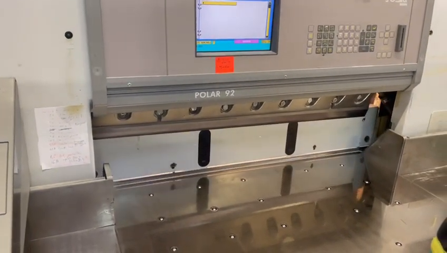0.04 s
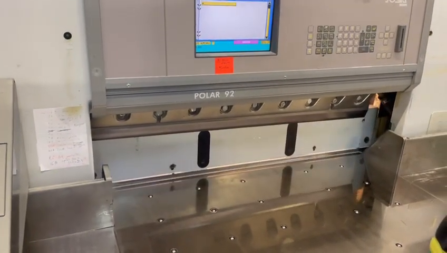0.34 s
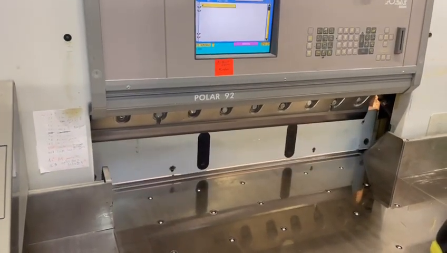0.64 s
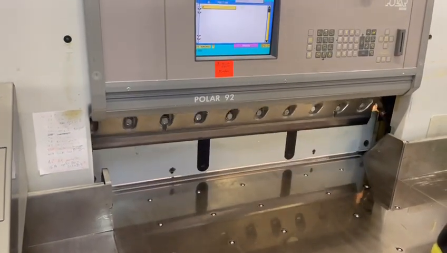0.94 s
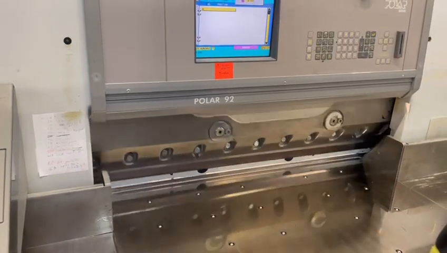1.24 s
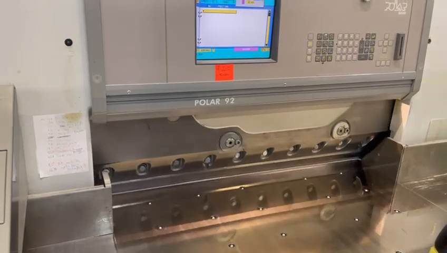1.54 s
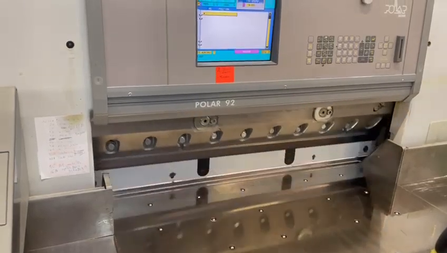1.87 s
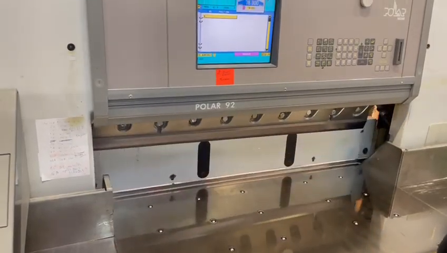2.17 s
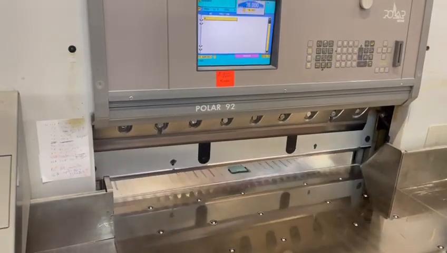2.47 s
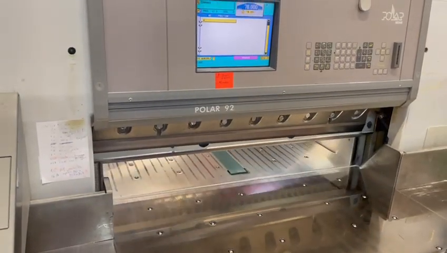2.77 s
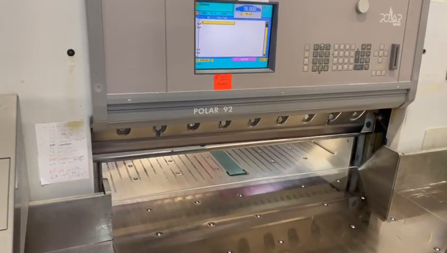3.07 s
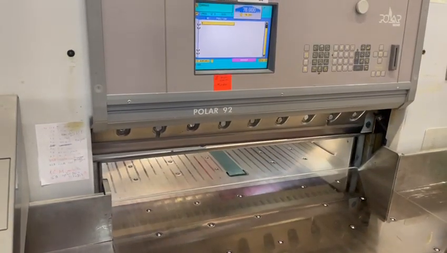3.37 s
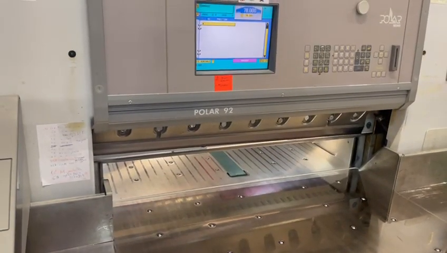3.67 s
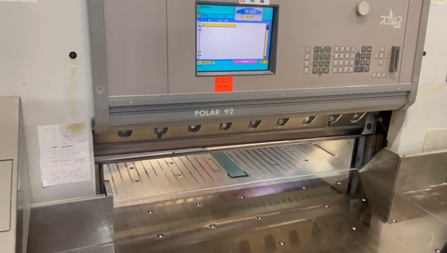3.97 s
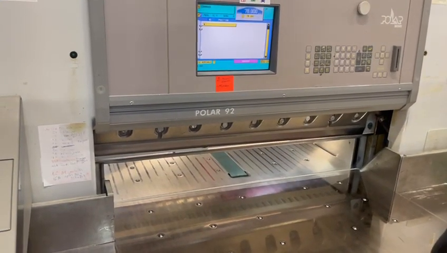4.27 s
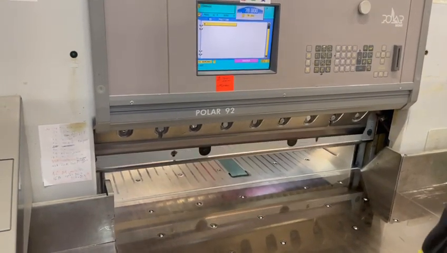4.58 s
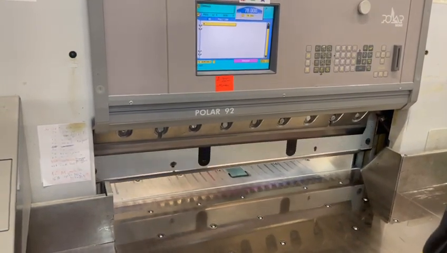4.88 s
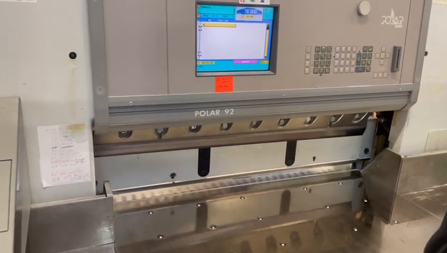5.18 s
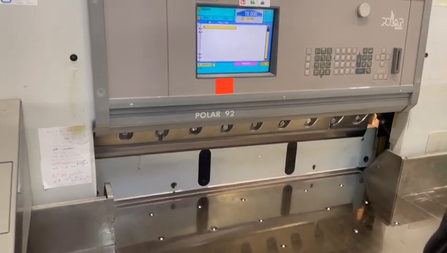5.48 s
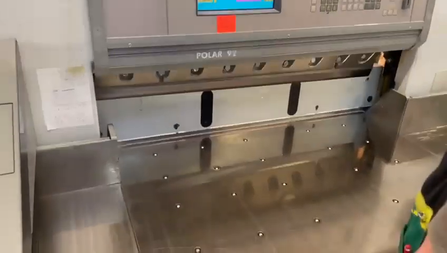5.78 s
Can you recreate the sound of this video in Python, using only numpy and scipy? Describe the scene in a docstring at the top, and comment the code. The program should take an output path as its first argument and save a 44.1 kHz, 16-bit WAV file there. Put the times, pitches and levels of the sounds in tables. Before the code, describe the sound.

Heard from just in front, an industrial paper cutter runs with a steady motor drone and rush of air. It opens with a heavy metal clunk, followed by clamp knocks, short scrapes and a groaning whine as the blade moves without paper. A sharp clack and a few rattling snaps follow. After a stretch of plain humming, the hydraulic pump grows louder and another heavy clunk rings briefly in the workshop.

```python
"""A workshop: a hydraulic paper guillotine runs through one empty cut.
Fan and oil flow rush, cooling air hisses, and a thin hiss returns with every turn of the belt.
Motor and pump hum throughout; pump and gears sag in pitch as the whining knife drive loads the flywheel.
A heavy clunk opens and closes the cycle. Between them clamp, clutch and knife linkage rub, snap and
knock on the steel frame. A gain control ducks the loudest blows."""
import sys
import numpy as np
from scipy import signal
from scipy.io import wavfile
from scipy.ndimage import uniform_filter1d

SR = 44100
rng = np.random.default_rng(int(sys.argv[2]) if len(sys.argv) > 2 else 0)


def transcribe(signal):
    """Save signal, clipped to [-1, 1], as a 16-bit WAV file at the path in sys.argv[1]."""
    frames = np.atleast_2d(signal).T
    limited = np.clip(frames, -1, 1)
    pcm = np.round(limited * 32767).astype(np.int16)
    wavfile.write(sys.argv[1], SR, pcm)


N = 265482
TIME_S = np.arange(N) / SR
EDGES_HZ = 22 * 2 ** np.arange(0, 9.4, 1 / 3)   # third-octave bands
CENTRES_HZ = np.sqrt(EDGES_HZ[1:] * EDGES_HZ[:-1])
CLUTCH_IN_S, CLUTCH_OUT_S = .76, 2.15
KNIFE_START_S, KNIFE_BOTTOM_S, KNIFE_REST_S = .76, 1.65, 2.42
VANE_HZ, MESH_HZ = 322.5, 297   # pump vanes and gear mesh at full speed

# Stereo balance. Each row: frequency in Hz, left minus right in dB.
BALANCE = [(60, -1), (130, -3), (250, -2), (600, 1), (2000, -0.3), (5000, 0.7), (11000, -10)]
# Width of running noise and blows. Each row: frequency in Hz, left-right correlation before clipping.
RUNNING_CORRELATION = [(60, 0.86), (110, 0.92), (200, 0.83), (350, 0.21), (640, 0.05), (1160, -0.19),
                       (2100, 0.42), (3600, 0.058), (5000, 1), (6300, -2.9), (11000, -0.71)]
BLOW_CORRELATION = [(100, 1), (350, 0.91), (640, 0.27), (1160, 0.15), (2100, 0.68), (3800, 0.11),
                    (5000, 0.57), (6500, -1.3), (8000, -0.95), (10000, 1)]
# Noise spectra. Each row: frequency in Hz, relative density in dB.
RUNNING_SPECTRUM = [(15, -68), (25, -54), (48, -10), (69, -8), (103, -7.5), (191, -6.5), (210, -9.5),
                    (319, -9.5), (349, -11), (375, -8), (568, -8.5), (990, -15), (1430, -17.5),
                    (2100, -24.5), (2650, -23), (3600, -27.5), (6300, -35.5), (8190, -127), (13900, -120)]
SLIDING_SPECTRUM = [(80, -22), (150, 12.5), (450, -24), (800, 0), (1300, -19), (3000, -13.5), (6000, -20.5)]
ARMATURE_SPECTRUM = [(300, 1), (800, 0), (1100, 2.5), (1500, -2), (3100, -1.5), (3900, -20), (5500, -4),
                     (7000, -19), (11000, -25)]
SNAP_SPECTRUM = [(150, -1), (260, 0), (400, 5), (800, -18), (2100, -5), (5000, -0.5), (7000, 4), (9500, -9),
                 (12500, -28)]
CLUNK_SPECTRUM = [(60, -21), (100, -10.5), (140, 1.5), (240, 1.5), (380, -5.5), (520, -4.5), (690, -1.5),
                  (1000, -8.5), (1400, -5), (1750, -17), (2800, -15), (3700, -33.5), (5500, -26),
                  (12500, -54)]
ECHO_SPECTRUM = [(300, -15), (900, -11), (1500, 6.5), (2300, -3), (2700, -10), (3400, -2), (4200, -25),
                 (7000, -29)]
CRACK_SPECTRUM = [(1500, -8), (4200, 3), (6000, 3), (7500, 3), (8500, 1), (10000, -3), (12500, -28)]
# Panel colours. Each row: frequency in Hz, relative band level in dB.
SCRAPE_COLOUR = [(250, -6), (700, -1.5), (1200, -9), (1700, -7), (2700, -7), (3800, -19), (6500, -23)]
KNOCK_COLOUR = [(130, -2.5), (230, 2), (420, -2), (900, 0.5), (2100, -13), (6500, -30)]
# Hiss resonances. Each row: centre in Hz, width in Hz, relative level in dB, left-right correlation.
AIR_PEAKS = [(5000, 1300, -52.5, .9), (6100, 800, -57, .9), (7300, 2400, -50.5, -.9),
             (10000, 2200, -56, .95)]
BELT_PEAKS = [(4930, 280, 1, .9), (5100, 1800, -3, .3), (8300, 1700, -4, -.95), (9650, 1300, -1.5, .95)]
# Belt brushes. Each row: time into the turn in seconds, half length in seconds, relative level in dB.
BELT_BRUSHES = [(0.047, 0.095, -51.5), (0.973, 0.17, -50)]
# Motor and fan tones. Each row: frequency in Hz, level in dB.
MOTOR_TONES = [(80.4, -36), (113.0, -44.5), (271, -41.5), (376.8, -42.5), (963.6, -42.5), (1195, -46),
               (2449, -54.5), (2568, -69)]
# Pump under pressure. Each row: start in seconds, end in seconds, level in dB.
PUMP_SPELLS = [(-.1, .08, -30), (0.185, 0.53, -27), (0.645, 0.98, -28.5), (0.98, 1.65, -32),
               (2.614, 3.5, -37), (4.515, 5.57, -29), (5.68, 6.2, -29.5)]
# Pressure peaks as the clamp bears down or meets its top stop.
# Each row: centre in seconds, half length in seconds, level in dB.
PUMP_SURGES = [(0.705, 0.03, -22.5), (2.746, .04, -41), (5.43, 0.097, -38)]
# Whine partials. Each row: multiple of the mesh or vane rate, relative level in dB.
MESH_ORDERS = [(1, -2.5), (2, -6.5)]
VANE_ORDERS = [(2, -1.5), (3, -9)]
# Drive groans. Each row: centre in seconds, full-speed pitch in Hz, half length in seconds, level in dB.
GROANS = [(0.903, 964, 0.049, -34), (0.966, 592, 0.048, -31.5), (1.092, 154, 0.06, -25),
          (1.465, 588, 0.05, -29), (1.49, 649, 0.054, -34.5), (1.507, 836, 0.32, -34.5),
          (1.544, 841, 0.021, -30), (2.047, 296.6, 0.11, -36), (2.122, 601, 0.08, -37)]
# Rubs. Each row: centre in seconds, half length in seconds, relative level in dB, tilt in dB per octave.
SCRAPES = [(0.552, 0.02, -34.5, 2), (0.707, 0.032, -40, 2), (0.923, 0.029, -36.5, 0.5),
           (1.634, 0.043, -38, -5.5)]
# Steel modes. Each row: frequency in Hz, relative level in dB, t60 in seconds before damping and cap.
ARMATURE_MODES = [(1063, 0, 0.057), (1121, 2, 0.059), (1490, -6, 0.045), (1890, -5, 0.066),
                  (2556, -2.5, 0.039), (3120, -12, 0.031), (5130, -14, .04)]
PAWL_MODES = [(387, -2.5, 0.076), (470, -13, .08), (758, 0, 0.062), (1340, -2, .035), (1460, -4, .035),
              (1555, 4, 0.027), (1800, 0, 0.017), (2166, -1.5, 0.053), (2264, 1.5, 0.046),
              (3160, -9, 0.069), (3300, -11, .04), (3740, -10.5, .03), (4740, -21, .11), (5270, -21, 0.12),
              (5680, -27, .15), (6200, -32, 0.22)]
CATCH_MODES = [(375, 5, .09), (725, 2.5, .07), (830, 3, .06), (1020, 0, 0.058), (1200, 4, 0.06),
               (3675, -8, 0.074), (4450, -8, 0.083), (5540, -6, 0.07), (8920, -3, .025), (9500, -5, .06)]
CLAMP_MODES = [(200, -8, 0.12), (389, 0, 0.1), (682, -1, 0.035), (870, -30, 0.047), (985, -9, 0.059),
               (1227, -9.5, 0.04)]
FRAME_MODES = [(125.2, -6, 0.57), (168, -11, 0.3), (203, -4, 0.3), (254, 2.5, 0.25), (306, -22, 0.1),
               (358.7, -3.5, 0.52), (379, 5, 0.11), (458, -0.5, 0.13), (650, 1, 0.099), (693, 3.5, 0.068),
               (853, 1, 0.07), (1100, -4, 0.091), (1322, -7, 0.028), (1435, -6, 0.091), (2013, -2, 0.1),
               (2205, -14, 0.13)]
# Strikes of small parts. Each row: start in seconds, ring level in dB, rattle level in dB.
ARMATURE_HITS = [(0.693, -24, -22.5), (0.7027, -33, -27), (0.721, -47, -36), (0.733, -37, -42),
                 (2.201, -28.5, -22), (2.209, -34, -26)]
PAWL_HITS = [(1.8182, -14.5, -35), (1.8225, -32, -41), (1.828, -37, -33)]
CATCH_HITS = [(2.305, -22, -27), (2.312, -23, -20), (2.325, -33, -26)]
# Strikes on the clamp beam. Each row: start in seconds, level in dB.
CLAMP_HITS = [(0.598, -13), (0.6193, -11), (0.889, -22.5), (0.912, -20), (0.93, -28)]
# Light blows. Each row: start in seconds, relative level in dB, tilt in dB per octave.
KNOCKS = [(.119, -29, -0.5), (0.595, -28, 1), (0.614, -25, 0), (.893, -34, -4.5), (1.541, -26, -0.5),
          (1.588, -31.5, 2), (1.603, -31, -2.5), (1.8191, -30, -5), (2.207, -38.5, -5), (2.237, -34, -1.5),
          (2.291, -29.5, -2)]
# Heavy blows. Each row: start in seconds, relative level in dB, crack offset in dB.
CLUNKS = [(.036, 3, 0.5), (5.496, 2.5, 2.5)]


def from_db(db):
    """Decibels to gain."""
    return 10 ** (np.asarray(db) / 20)


def unit_rms(x):
    """Scale to rms 1."""
    return x / np.sqrt(np.mean(x ** 2) + 1e-20)


def at_hz(table, hz):
    """Read a table on a log-frequency axis."""
    points_hz, values = np.array(table).T
    return np.interp(np.log(hz), np.log(points_hz), values)


def balance(hz):
    """Left and right gain at a pitch; bass leans right."""
    return from_db(at_hz(BALANCE, hz) * np.array([[.5], [-.5]]))


def drift(rate_hz):
    """Smooth random wander of rms 1."""
    pole = np.exp(-200 * np.pi * rate_hz / SR)
    white = rng.standard_normal(N // 100 + 1002)
    slow = signal.lfilter([1], [1, -2 * pole, pole * pole], white)[1000:]
    return np.interp(np.arange(N) / 100, np.arange(len(slow)), unit_rms(slow))


def smooth(x, tau_s):
    """First-order lag."""
    pole = np.exp(-1 / (tau_s * SR))
    return signal.lfilter([1 - pole], [1, -pole], x)


def swell(centre_s, half_s):
    """Gaussian bell of height 1."""
    return np.exp(-.5 * ((TIME_S - centre_s) / half_s) ** 2)


def gate(start_s, end_s, ramp_s):
    """1 from start to end, with a ramp centred on each."""
    return np.clip(np.minimum(TIME_S - start_s, end_s - TIME_S) / ramp_s + .5, 0, 1)


def stereo_band(white, edges_hz, correlation):
    """Band-pass two noises and mix them as mid and side; rms 1."""
    mid, side = signal.sosfilt(signal.butter(2, edges_hz, "band", fs=SR, output="sos"), white)
    return unit_rms(np.sqrt(1 + correlation) * mid + np.sqrt(1 - correlation) * side * [[1], [-1]])


def noise_bands(correlations):
    """Third-octave bands of stereo noise."""
    white = rng.standard_normal((2, 2, N))
    clipped = np.clip(at_hz(correlations, CENTRES_HZ), -.99, .99)
    return [balance(hz) * stereo_band(white[k % 2], EDGES_HZ[k:k + 2], clipped[k])
            for k, hz in enumerate(CENTRES_HZ)]


def peaked_noise(peaks):
    """Stereo noise in a few broad resonances."""
    out = np.zeros((2, N))
    for hz, width_hz, db, correlation in peaks:
        white = rng.standard_normal((2, N))
        out += from_db(db) * stereo_band(white, [hz - width_hz / 2, hz + width_hz / 2], correlation)
    return out


def band_gains(spectrum):
    """Band gains of total power 1; no bands above the last row."""
    gains = from_db(at_hz(spectrum, CENTRES_HZ)) * np.sqrt(CENTRES_HZ)
    gains *= EDGES_HZ[:-1] < spectrum[-1][0]
    return gains / np.linalg.norm(gains)


def panel_gains(colour, db_per_octave):
    """Band gains tilted by contact hardness; the panels are too small to radiate deep bass."""
    tilt_db = db_per_octave * np.log2(np.maximum(CENTRES_HZ, 250) / 800)
    rolloff = np.sqrt((1 + (150 / CENTRES_HZ) ** 6) * (1 + (CENTRES_HZ / 10500) ** 8))
    return from_db(at_hz(colour, CENTRES_HZ) + tilt_db) / rolloff


def tone(hz, waver_db, spread):
    """Stereo sine; reflections make its level waver, and its phase at each ear."""
    phase = 2 * np.pi * np.cumsum(hz + np.zeros(N)) / SR
    spread_rad = spread * min(np.mean(hz) / 600, 1)
    ears = np.array([np.sin(phase + spread_rad * drift(1)) for _ in range(2)])
    return np.sqrt(2) * balance(np.mean(hz)) * ears * from_db(waver_db * drift(2.6))


def ring(modes, hits, damping, max_t60_s):
    """Each hit sets the modes of a steel part ringing."""
    clicks, out = np.zeros(N) + 1e-18, np.zeros((2, N))
    for start_s, db, *_ in hits:
        clicks[int(start_s * SR)] += from_db(db)
    for k, (hz, db, t60_s) in enumerate(modes):
        pole = from_db(-60 / (min(t60_s / damping, max_t60_s) * SR))
        step_rad = 2 * np.pi * hz / SR
        mode = signal.lfilter([0, np.sin(step_rad)], [1, -2 * pole * np.cos(step_rad), pole ** 2], clicks)
        out += (-1) ** k * from_db(db) * balance(hz) * mode
    return out


def blow(bands, start_s, gains, rise_s, tail_db, t60_s, lag_s=.0002):
    """Dense panel modes: bending waves bring treble before bass, then the room rings. Times at 1 kHz."""
    start = int(start_s * SR)
    t = TIME_S[:min(N - start, int(.6 * SR))]
    span = slice(start, start + len(t))
    out = np.zeros((2, N))
    for band, hz, gain in zip(bands, CENTRES_HZ, gains):
        slowness = np.sqrt(1000 / max(hz, 250))
        age_s = np.maximum(t - lag_s * slowness, 0)
        onset = age_s / (rise_s * slowness ** .29)
        direct = onset * np.exp(1 - onset)
        tail = from_db(tail_db - 60 * age_s / (t60_s * slowness ** .44)) * (1 - np.exp(-onset))
        out[:, span] += gain * np.hypot(direct, tail) * band[:, span]
    return out


def rattle(bands, hits, spectrum, **envelope):
    """The housing scatters each strike of a small part into a noise burst."""
    gains = band_gains(spectrum)
    return sum(blow(bands, start_s, from_db(db) * gains, **envelope) for start_s, _, db in hits)


def flywheel_speed(sag=.0655):
    """1 when free; sags while the clutch is in, then recovers."""
    loaded = (TIME_S > CLUTCH_IN_S) & (TIME_S < CLUTCH_OUT_S)
    return 1 - sag * smooth(loaded, tau_s=.21)


def knife_effort(down_db=-37.5, upstroke_db=-3, strain_db=3.5):
    """Drive gain: steady going down, straining at the bottom, lighter going up."""
    db = down_db + upstroke_db * (TIME_S > KNIFE_BOTTOM_S) + strain_db * swell(KNIFE_BOTTOM_S, .066)
    return gate(KNIFE_START_S, KNIFE_REST_S, ramp_s=.19) * from_db(db)


def running_noise(rush_db=-25.67, sliding_db=3):
    """Fan and oil flow rush, lumpy in the bass; sliding steel adds noise while the knife moves."""
    sliding = knife_effort() * from_db(sliding_db)
    rush_gains = from_db(rush_db) * band_gains(RUNNING_SPECTRUM)
    lumps_db = 2 / np.sqrt(1 + CENTRES_HZ / 300)
    layers = zip(noise_bands(RUNNING_CORRELATION), rush_gains, band_gains(SLIDING_SPECTRUM), lumps_db)
    return sum(band * np.hypot(rush, slide * sliding) * from_db(lump_db * drift(14.7))
               for band, rush, slide, lump_db in layers)


def cooling_air(gain_db=-1.5):
    """Cooling air hisses steadily."""
    return from_db(gain_db) * peaked_noise(AIR_PEAKS)


def belt(gain_db=1.5, turn_s=1.598, flutter_db=2):
    """A slowly turning part, likely the belt, brushes twice a turn, gripping and slipping."""
    hiss = peaked_noise(BELT_PEAKS) * from_db(flutter_db * drift(25))
    return hiss * sum(from_db(db + gain_db) * swell(start_s + offset_s, half_s)
                      for offset_s, half_s, db in BELT_BRUSHES
                      for start_s in np.arange(0, TIME_S[-1], turn_s))


def motor():
    """Motor and fan hum; the high tones wander more in pitch."""
    out = np.zeros((2, N))
    for hz, db in MOTOR_TONES:
        jitter = .0005 if hz < 1100 else .003
        out += from_db(db) * tone(hz * (1 + jitter * drift(5)), waver_db=1, spread=.4)
    return out


def flywheel_gear(level_db=-39, throb_hz=4.3, depth=.64):
    """The idling gear hums at the mesh rate and throbs."""
    throb = 1 + depth * np.sin(2 * np.pi * throb_hz * TIME_S)
    return from_db(level_db) * throb * tone(MESH_HZ * flywheel_speed(), waver_db=2, spread=.5)


def pump(idle_db=-41.5, valve_s=.082):
    """The vane note swells with pressure and sags with the flywheel."""
    work = sum(from_db(db) * gate(start_s, end_s, valve_s) for start_s, end_s, db in PUMP_SPELLS)
    surge = sum(from_db(db) * swell(centre_s, half_s) for centre_s, half_s, db in PUMP_SURGES)
    pressure = np.hypot(from_db(idle_db), work + surge)
    return pressure * tone(VANE_HZ * flywheel_speed(), waver_db=.5, spread=.3)


def knife_drive(rough_db=2):
    """Loaded gear and pump tones whine and swell briefly into rough groans; all sag with the flywheel."""
    partials = [(k * MESH_HZ, db) for k, db in MESH_ORDERS] + [(k * VANE_HZ, db) for k, db in VANE_ORDERS]
    speed = flywheel_speed()
    whine = sum(from_db(db) * tone(hz * speed * (1 + .005 * drift(30)), waver_db=2.5, spread=.5)
                for hz, db in partials)
    out = knife_effort() * whine
    for centre_s, hz, half_s, db in GROANS:
        envelope = from_db(db + rough_db * drift(39)) * swell(centre_s, half_s)
        out += envelope * tone(hz * speed * (1 + .006 * drift(47)), waver_db=2, spread=.25)
    return out


def scrapes(bands, rough_db=2.5):
    """The clamp rubs its guides and the knife bar rumbles: gritty swells with a soft top."""
    grit = from_db(rough_db * drift(90))
    lowpass = 1 / np.sqrt(1 + (CENTRES_HZ / 6000) ** 8)
    out = np.zeros((2, N))
    for centre_s, half_s, db, db_per_octave in SCRAPES:
        near = np.abs(TIME_S - centre_s) < 4 * half_s
        gains = lowpass * panel_gains(SCRAPE_COLOUR, db_per_octave)
        rub = sum(gain * band[:, near] for gain, band in zip(gains, bands))
        out[:, near] += from_db(db) * rub * (grit * swell(centre_s, half_s))[near]
    return out


def armature(bands):
    """A small steel plate, likely the clutch magnet's armature, chatters pulling in and dropping out."""
    steel = ring(ARMATURE_MODES, ARMATURE_HITS, damping=.36, max_t60_s=.22)
    return steel + rattle(bands, ARMATURE_HITS, ARMATURE_SPECTRUM, rise_s=.002, tail_db=-8.5, t60_s=.31)


def pawl(bands, echo_db=-12.5):
    """The clutch pawl clacks; its first strike echoes in the housing."""
    steel = ring(PAWL_MODES, PAWL_HITS, damping=.69, max_t60_s=.29)
    snap = rattle(bands, PAWL_HITS, SNAP_SPECTRUM, rise_s=.005, tail_db=-8, t60_s=.22)
    echo_gains = from_db(echo_db) * band_gains(ECHO_SPECTRUM)
    return steel + snap + blow(bands, PAWL_HITS[0][0], echo_gains, rise_s=.002, tail_db=-8, t60_s=.38)


def catch(bands):
    """The catch snaps as the knife rises."""
    steel = ring(CATCH_MODES, CATCH_HITS, damping=.84, max_t60_s=.049)
    return steel + rattle(bands, CATCH_HITS, SNAP_SPECTRUM, rise_s=.0053, tail_db=-8.5, t60_s=.19)


def clamp_beam():
    """The struck beam rings briefly."""
    return ring(CLAMP_MODES, CLAMP_HITS, damping=.89, max_t60_s=.2)


def knocks(bands, body_db=1, ring_db=-5):
    """Clamp, clutch and linkage strike panels and frame; harder contact is brighter."""
    hits = [(start_s + .004, db + ring_db) for start_s, db, _ in KNOCKS]
    out = ring(FRAME_MODES, hits, damping=1, max_t60_s=.2)
    for start_s, db, db_per_octave in KNOCKS:
        gains = from_db(db + body_db) * panel_gains(KNOCK_COLOUR, db_per_octave)
        out += blow(bands, start_s, gains, rise_s=.0039, tail_db=-7.5, t60_s=.34, lag_s=.00045)
    return out


def clunks(bands, body_db=-7, crack_db=-18.5, seat_db=-16, rebound_db=-15, soft_contact_hz=377):
    """Steel cracks on contact; the heavy part seats, damping the frame, then rebounds with a dull ring."""
    seats = [(start_s + .0062, db + seat_db) for start_s, db, _ in CLUNKS]
    rebounds = [(start_s + .031, db + rebound_db) for start_s, db, _ in CLUNKS]
    low_modes = [(hz, db - 10 * np.log10(1 + (hz / soft_contact_hz) ** 8), t60_s)
                 for hz, db, t60_s in FRAME_MODES]
    out = ring(FRAME_MODES, seats, damping=.7, max_t60_s=.089)
    out += ring(low_modes, rebounds, damping=1, max_t60_s=.6)
    for start_s, db, offset_db in CLUNKS:
        crack_gains = from_db(db + crack_db + offset_db) * band_gains(CRACK_SPECTRUM)
        body_gains = from_db(db + body_db) * band_gains(CLUNK_SPECTRUM)
        out += blow(bands, start_s, crack_gains, rise_s=.003, tail_db=-11, t60_s=.15)
        out += blow(bands, start_s, body_gains, rise_s=.0081, tail_db=-6, t60_s=.53, lag_s=.00058)
    return out


def scene():
    """The machine from the operator's place."""
    bands = noise_bands(BLOW_CORRELATION)
    small_parts = scrapes(bands) + armature(bands) + pawl(bands) + catch(bands)
    blows = clamp_beam() + knocks(bands) + clunks(bands)
    running = motor() + flywheel_gear() + pump() + running_noise()
    return running + knife_drive() + cooling_air() + belt() + small_parts + blows


def record(dry, threshold_db=-12.5, duck_share=.79, recover_db_per_s=29.5, cutoff_hz=11750):
    """Gain control ducks after the loudest blows and recovers slowly; peaks are rounded, the top cut."""
    power = uniform_filter1d(np.mean(dry ** 2, axis=0), size=800)
    level_db = 10 * np.log10(np.maximum(power, 1e-12))
    target_db = duck_share * np.maximum(level_db - threshold_db, 0)
    recovery_db = recover_db_per_s * TIME_S
    duck_db = np.maximum.accumulate(target_db + recovery_db) - recovery_db
    ducked = dry * from_db(-smooth(duck_db, tau_s=.029))
    rounded = ducked / (1 + (ducked / .9) ** 4) ** .25
    return signal.sosfilt(signal.ellip(10, .3, 80, cutoff_hz, fs=SR, output="sos"), rounded)


dry = scene()
out = record(dry)
transcribe(out)
```